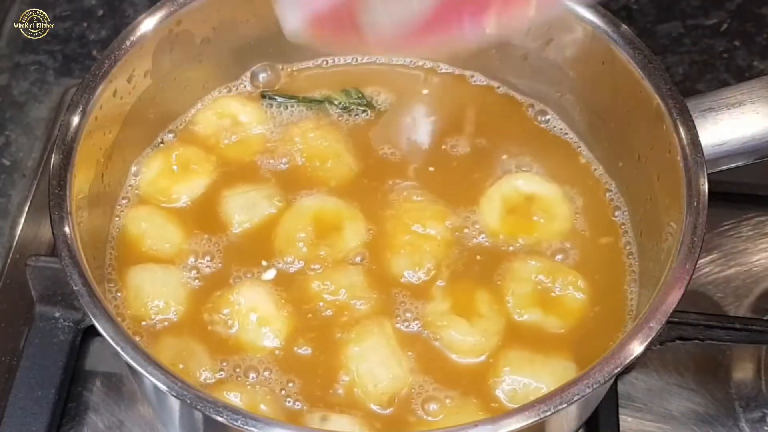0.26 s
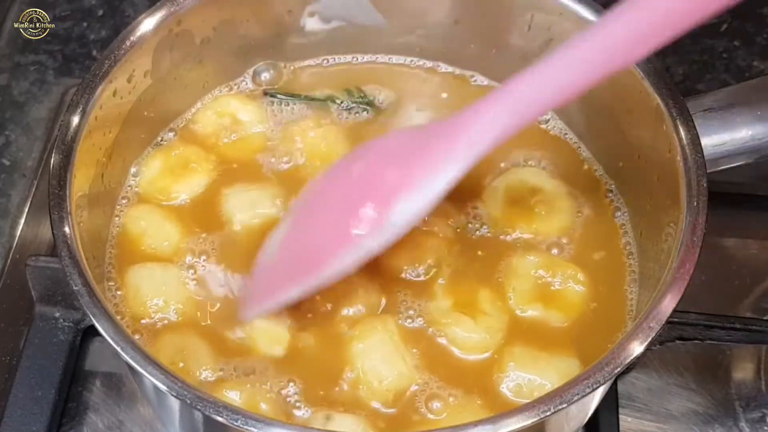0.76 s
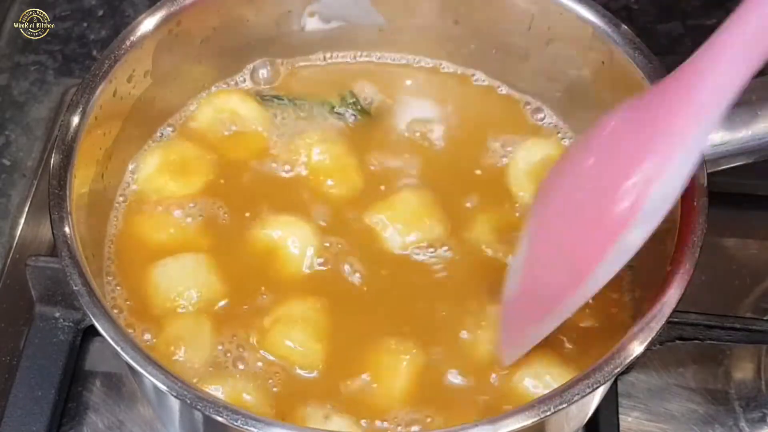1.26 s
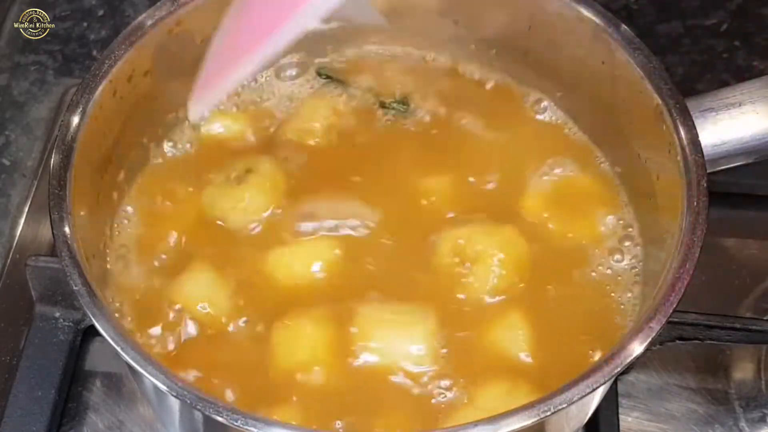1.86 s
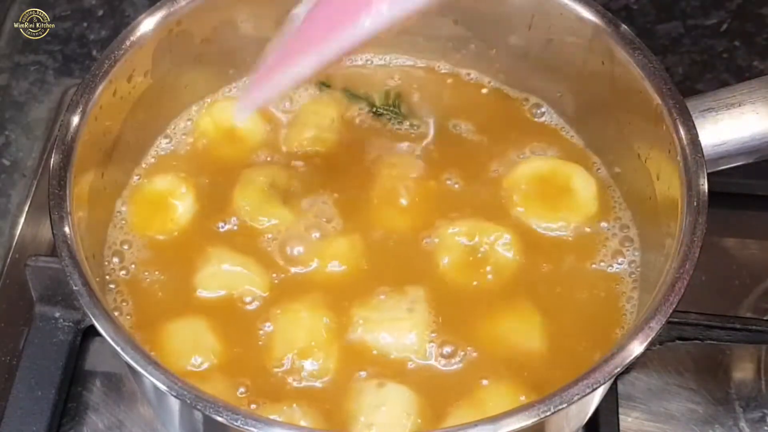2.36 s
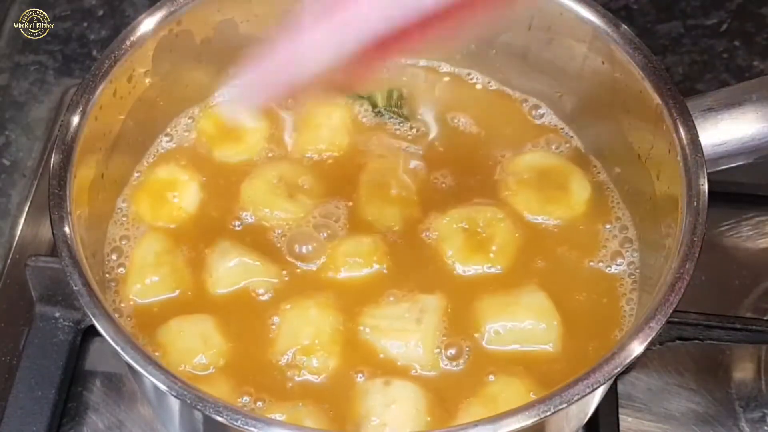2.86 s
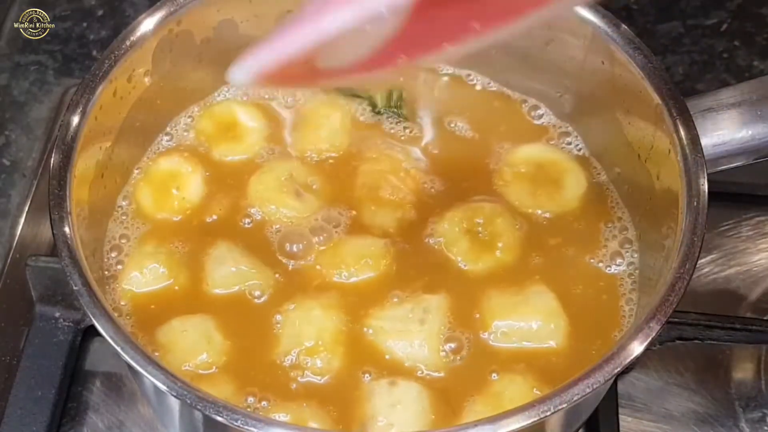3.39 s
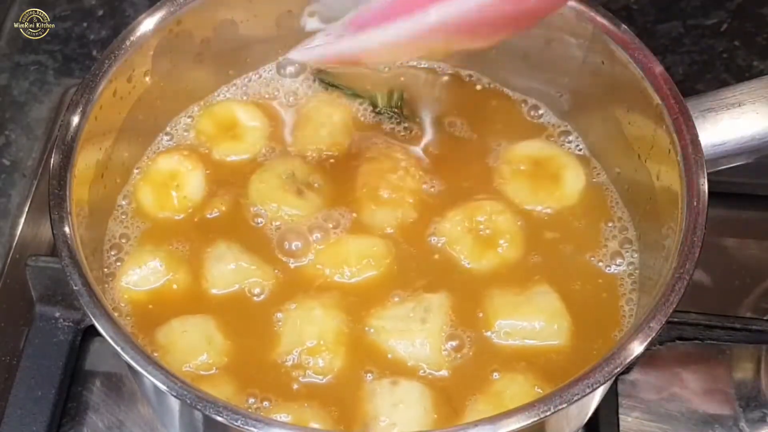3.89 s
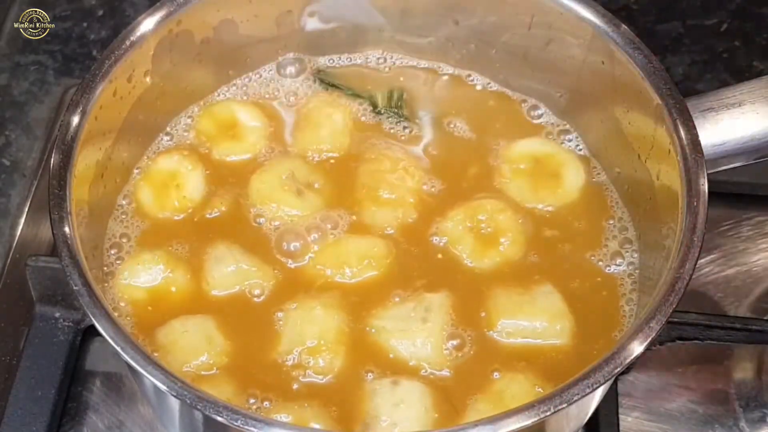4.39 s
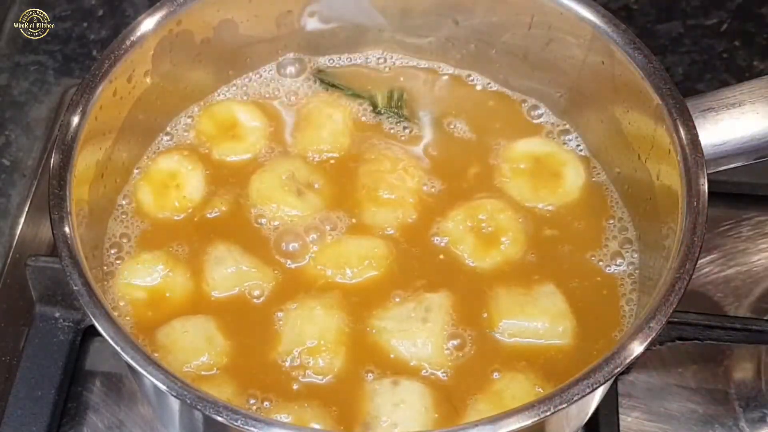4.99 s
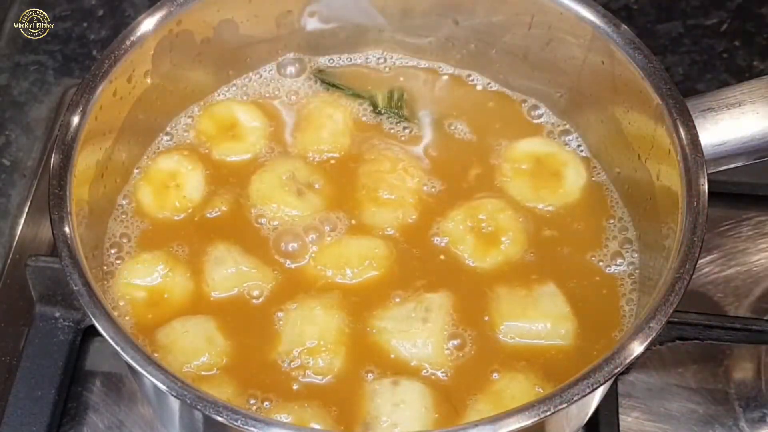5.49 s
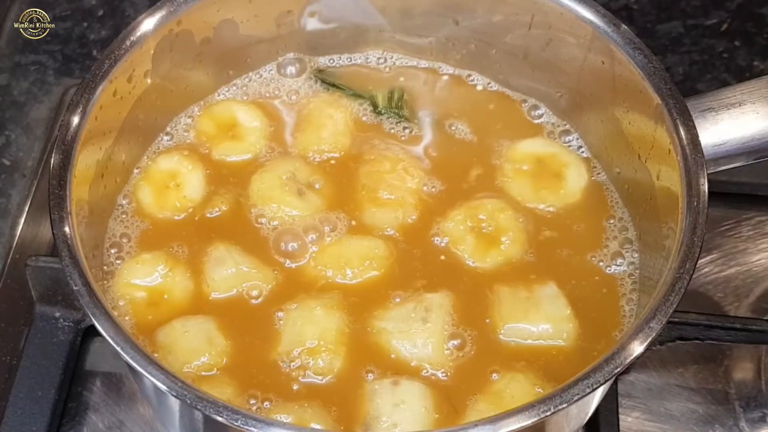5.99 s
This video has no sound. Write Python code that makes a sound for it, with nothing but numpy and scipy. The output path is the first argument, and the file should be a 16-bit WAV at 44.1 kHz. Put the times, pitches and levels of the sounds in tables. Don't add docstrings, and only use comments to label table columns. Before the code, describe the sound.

Steady gas burner hiss and an unsteady deep flame boom run throughout, with the low seethe of simmering syrup. A soft spoon bumps the pan dully, liquid swishes and several bubbles pop. Later comes a faint bump, then a firm low thud, and light bright knocks as something is set down, with a faint splash. Heard close up in a small room with a short diffuse tail.

```python
import sys
import numpy as np
from scipy import signal
from scipy.fft import rfft, irfft, next_fast_len
from scipy.io import wavfile
from scipy.ndimage import uniform_filter1d, map_coordinates

SR = 44100
rng = np.random.default_rng(int(sys.argv[2]) if len(sys.argv) > 2 else 0)


def how_loud(loudness_db):
    steps = np.asarray(loudness_db, float) / 20
    return 10 ** steps


def inscribe(sig):
    pcm = np.round(np.clip(np.atleast_2d(sig).T, -1, 1) * 32767)
    wavfile.write(sys.argv[1], SR, pcm.astype(np.int16))


N = 275625


def unit(x):
    return x / np.sqrt(np.mean(x.mean(0) ** 2) + 1e-20)


def along(points, hz):
    f, v = np.transpose(points)
    return np.interp(np.log(hz + 1), np.log(f + 1), v)


def wobble(rate):
    knots = rng.standard_normal(int(N * rate / SR) + 4)
    return map_coordinates(knots, [np.arange(N) * rate / SR])


def ripple(hz, step_hz):
    knots = rng.standard_normal((2, int(SR / 2 / step_hz) + 4))
    return np.array([map_coordinates(k, [hz / step_hz]) for k in knots])


def hump(s, length):
    return 0.5 ** ((2 * (np.arange(N) / SR - s) / length) ** 2)


def filtered(x, response):
    m = next_fast_len(N + SR // 2)
    return irfft(rfft(x, m) * response(np.fft.rfftfreq(m, 1 / SR)), m)[..., :N]


def patchy(patchy_db):
    z = signal.stft(rng.standard_normal((2, N)), nperseg=512)[2]
    field = uniform_filter1d(rng.standard_normal(z.shape[1:]), 8, 0)
    field = uniform_filter1d(field, 10, 1)
    return signal.istft(z * how_loud(patchy_db * field / field.std()), nperseg=512)[1][:, :N]


def paired(pair, alike):
    def mid_side_gains(hz):
        turn = np.arccos(np.clip(alike(hz), -1, 1)) / 2
        return np.array([np.cos(turn), np.sin(turn)])
    mid, side = filtered(pair, mid_side_gains)
    return np.array([mid + side, mid - side])


def flame():
    # f/Hz, level/dB
    boom = [(25, -32), (45, -23), (70, -6.5), (100, 1), (130, -3), (170, -25), (230, -36.5), (300, -120)]
    # t/s, rise/dB, length/s
    flares = [(0.0, 4, 0.19), (.35, 7, 0.037), (0.525, 5.5, 0.08), (.6, 4.5, .08), (0.763, 7.5, 0.068),
              (1.286, 7.5, 0.06), (1.41, 2.5, 0.09), (1.7, 5, 0.072), (1.808, 4, 0.057), (1.984, 5, .13),
              (2.165, 3.5, 0.28), (2.62, 6.5, 0.036), (2.701, 8, 0.047), (2.868, 2, 0.12), (3.17, 3, 0.11),
              (3.322, 6, 0.12), (3.897, 4.5, 0.15), (4.043, 4, 0.08), (4.177, 4, 0.06), (4.333, 3.5, 0.13),
              (4.608, 9, 0.07), (4.716, 5.5, .1), (5.003, 8, 0.11), (5.125, 6.5, 0.19), (5.41, 5, 0.062),
              (5.66, 2.5, 0.088), (5.883, 3.5, 0.12), (6.11, 5.5, 0.068), (6.25, 5, 0.069)]
    # t/s, drop/dB
    lulls = [(.29, 4), (.56, 9), (2.07, 4.5), (2.45, 11), (2.58, 8), (4.65, 9), (4.82, 4), (5.05, 19)]
    roar = filtered(rng.standard_normal(N), lambda hz: how_loud(along(boom, hz)))
    power = uniform_filter1d(uniform_filter1d(roar ** 2, 2600), 2600)
    swell = np.sqrt(np.abs(power))
    level_db = -42 + sum(db * hump(s, length) for s, db, length in flares)
    level_db = level_db - sum(db * hump(s, 0.052) for s, db in lulls)
    steadied = roar / swell ** 0.85
    return how_loud(level_db) * unit(how_loud([[1.9], [-1.9]]) * steadied)


def seething():
    # f/Hz, level/dB
    rush_colour = [
        [(90, -120), (140, -1), (200, -2), (260, -1), (310, -3.5), (365, -2.5), (420, -7), (470, -14),
         (530, -4), (610, -9.5), (680, -8.5), (760, -10.5), (900, -24), (1100, -49)],
        [(90, -120), (140, -6.5), (200, -4.5), (260, -0.5), (310, -9), (365, -8), (420, -10.5), (480, -21),
         (530, -16.5), (610, -15.5), (680, -11), (760, -31), (900, -21.5), (1100, -67)],
    ]
    # f/Hz, correlation
    rush_alike = [(150, 1), (400, 0.89), (700, 0.79), (1000, 0.67)]
    # t/s, rise/dB
    stirred = [
        (1.2, 0.7),
        (4.62, 1.5),
        (5.26, 0.5),
        (6.25, 1.5),
    ]
    rush = paired(patchy(patchy_db=0.73), lambda hz: along(rush_alike, hz))
    rush = filtered(rush, lambda hz: how_loud([along(port, hz) for port in rush_colour]))
    level_db = -49 + sum(db * hump(s, 0.33) for s, db in stirred) + 0.41 * wobble(3.22)
    return how_loud(level_db) * unit(rush)


def gas_hiss():
    # f/Hz, level/dB
    jet_colour = [
        [(720, -27.0), (950, -9.0), (1600, -15.0), (2450, 2.0), (3200, -10.0), (4150, -4.0), (4600, -6.0),
         (5300, -18.5), (6500, -6.0), (8600, -3.5), (10300, -9.5), (13000, -10.0), (14300, 1.0), (15400, -6.5)],
        [(720, -24.0), (950, -6.0), (1600, -4.5), (2450, -6.0), (3200, -10.0), (4150, -4.0), (4600, 4.5),
         (5300, -24.5), (6500, -12.5), (8600, -12.5), (10300, -16.0), (13000, -11.0), (14300, -8.0),
         (15400, -6.5)],
    ]
    # f/Hz, width/Hz, level/dB
    steel = [
        [(982, 71, 6.5), (1197, 62, -10), (1300, 365, 10), (1747, 140, 9.5), (1924, 120, 7), (2044, 447, -10),
         (2099, 85, 9.5), (2283, 51, 3), (2675, 110, -7.5), (2920, 120, -10), (3440, 300, -7), (4130, 116, 8.5),
         (6260, 240, -6), (7490, 460, -5.5), (8400, 240, 5), (8730, 160, 5.5), (12900, 680, 6),
         (13610, 280, -2), (15400, 160, 5)],
        [(950, 65, 7), (1044, 470, -10.5), (1630, 45, -2.5), (2060, 39, 1.5), (2890, 360, -11.5),
         (2925, 53, 14.5), (3420, 58, -6), (3460, 100, -6.5), (4170, 61, 7), (4490, 120, -3), (4695, 270, -12),
         (5480, 240, 10), (7220, 280, 9.5), (8880, 500, 8), (9230, 230, 3), (9850, 270, 2), (10170, 450, 5),
         (13550, 450, -4), (14500, 100, 2), (15300, 60, 1)],
    ]
    # f/Hz, correlation
    jet_alike = [(950, .55), (1550, -.5), (2100, -.4), (2500, .45), (3150, .3), (3370, -.5), (3560, .6),
                 (4080, -.55), (4550, .3), (5000, -.62), (5500, -.52), (6600, .4), (11500, .25),
                 (15400, .45)]

    def likeness(hz):
        return along(jet_alike, hz) * (1.25 + 0.35 * ripple(hz, step_hz=150)[0])

    def paths(hz):
        peaks_db = np.array([sum(db / (1 + (2 * (hz - c) / w) ** 2) for c, w, db in port) for port in steel])
        ripple_db = along([(2000, 1), (9000, 1.2), (12000, 2)], hz) * ripple(hz, step_hz=45)
        colour_db = np.array([along(port, hz) for port in jet_colour]) + peaks_db + ripple_db
        wander = along([(1000, 0.91), (6000, 0.19), (7500, 2.0)], hz)
        return how_loud(colour_db) * np.exp(1j * wander * ripple(hz, step_hz=301.14))

    jets = paired(patchy(patchy_db=1.4), likeness)
    return how_loud(-46.5 + 0.16 * wobble(6)) * unit(filtered(jets, paths))


def whistle():
    whistle_hz, drift_hz, level_db = 2279, 3, -72
    phase = 2 * np.pi * np.cumsum(whistle_hz + drift_hz * wobble(4)) / SR
    return how_loud(level_db + 5.4 * wobble(5)) * np.sin(phase) * how_loud([[1.2], [-1.2]])


def bumps():
    # t/s, level/dB, brightness/dB an octave, t60/s, rattle/dB
    blows = [
        (1.263, -32, -25, 0.46, -20),
        (2.806, -36.5, -2, 0.21, -17),
        (5.083, -31.5, -0.5, 0.48, -8.5),
        (5.468, -50, 1, 0.25, 3),
        (5.486, -43.5, 4, 0.34, 7),
        (5.549, -47, 7, 0.18, 11.5),
    ]
    # f/Hz, level/dB, share of t60
    body = [(229.3, -12.5, 1.2), (263.3, -2, 0.84), (297, -4, 0.61), (366.5, 0, 0.26), (526, 1, 0.14),
            (597, -6.5, 0.25), (694, -16, 0.13), (895, -26, .3)]
    pan_db = np.array([[1.5], [-1.5]])
    out, t = np.zeros((2, N + SR)), np.arange(SR // 2) / SR
    dull = signal.butter(3, [250, 800], "bandpass", fs=SR)
    for s, db, bright_db, t60, rattle_db in blows:
        blow = np.zeros(len(t))
        for hz, level, share in body:
            mode_db = level + bright_db * np.log2(hz / 260) + rng.normal(0, 0.46)
            blow += how_loud(mode_db - 60 * t / (t60 * share)) * np.sin(2 * np.pi * hz * t)
        rattle = signal.lfilter(*dull, rng.standard_normal(len(t)))
        blow += rattle * how_loud(rattle_db + 8.5 - 60 * t / (0.5 * t60))
        soft_onset = 1 - np.exp(-t / 0.0015)
        start = round(s * SR)
        out[:, start:start + len(t)] += how_loud(db + pan_db) * blow * soft_onset
    return out[:, :N]


def splash():
    # t/s, level/dB, hold/s
    stirs = [
        (1.418, -56, .07),
        (5.464, -59.5, 0.074),
    ]
    attack_s, t60_s = 0.013, 0.57
    colour = [(500, -38), (800, -13), (1400, -17), (2300, -14), (3500, -23), (9000, -35)]  # f/Hz, level/dB
    spikes = rng.standard_normal((2, N)) * (rng.random(N) < 0.04)
    spikes = spikes * how_loud(2.5 * rng.exponential(size=N))
    drops = filtered(spikes, lambda hz: how_loud(along(colour, hz)))
    t = np.arange(N) / SR
    size = np.zeros(N)
    for s, db, hold in stirs:
        rise = np.clip(1 + (t - s) / attack_s, 0, 1)
        size += rise * how_loud(db - 60 * np.clip(t - s - hold, 0, None) / t60_s)
    return size * unit(drops)


def plops():
    # t/s, level/dB, f/Hz, t60/s
    bubbles = [(1.426, -43, 950, .06), (1.441, -42, 2234, 0.066), (1.476, -44, 960, 0.048),
               (1.484, -34, 790, 0.054), (1.519, -39, 1530, 0.032), (1.52, -48, 2400, 0.058),
               (5.474, -45, 983, 0.066), (5.486, -39, 1044, 0.042), (5.493, -38.5, 567, 0.18),
               (5.552, -43, 930, 0.11)]
    out, t = np.zeros(N + SR), np.arange(SR // 4) / SR
    for s, db, hz, t60 in bubbles:
        phase = 2 * np.pi * hz * (t + 0.05 * t * t / t60)
        soft_onset = 1 - np.exp(-t / 0.0029)
        start = round(s * SR)
        out[start:start + len(t)] += how_loud(db - 60 * t / t60) * soft_onset * np.sin(phase)
    return out[:N] * how_loud([[0.8], [-0.8]])


def kitchen(x, t60):
    t = np.arange(SR // 3) / SR
    tail = rng.standard_normal((2, len(t))) * how_loud(-60 * t / t60) * (t > 0.004)
    return signal.fftconvolve(x, tail / np.linalg.norm(tail[0]), axes=1)[:, :N]


def scene():
    burner = flame() + gas_hiss() + whistle()
    near = bumps() + splash() + plops()
    return burner + seething() + near + how_loud(-12.5) * kitchen(near, t60=0.59)


def low_pass(x):
    return signal.sosfilt(signal.butter(12, 16580, fs=SR, output="sos"), x)


def record(dry):
    mix = filtered(dry, lambda hz: hz < 15520)
    return low_pass(mix)


dry = scene()
out = record(dry)
inscribe(out)
```